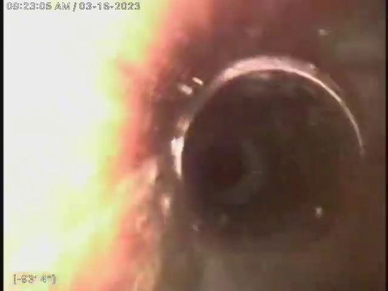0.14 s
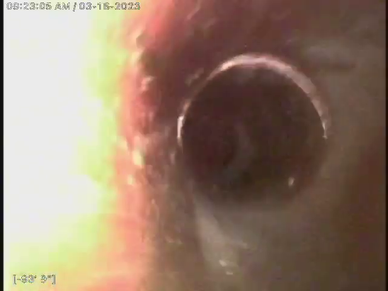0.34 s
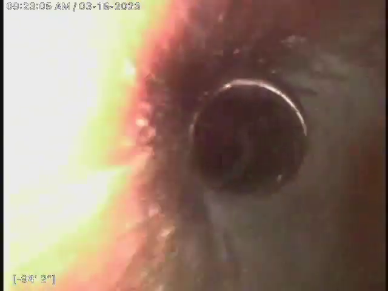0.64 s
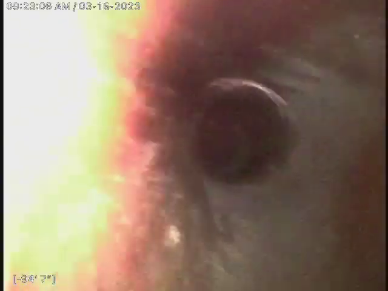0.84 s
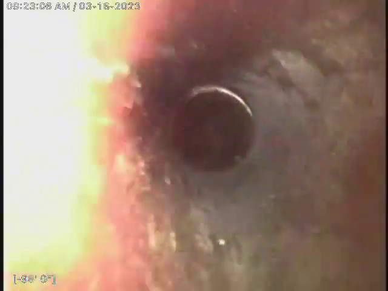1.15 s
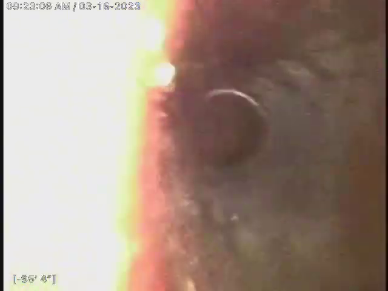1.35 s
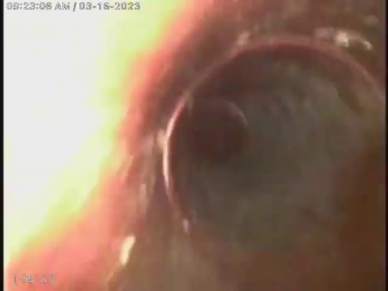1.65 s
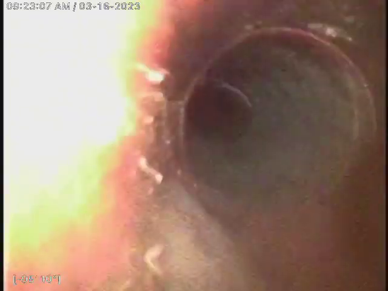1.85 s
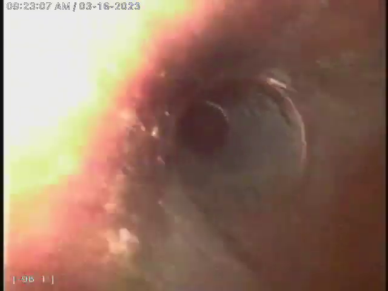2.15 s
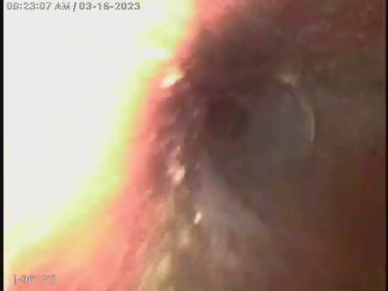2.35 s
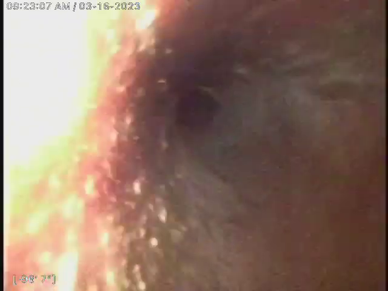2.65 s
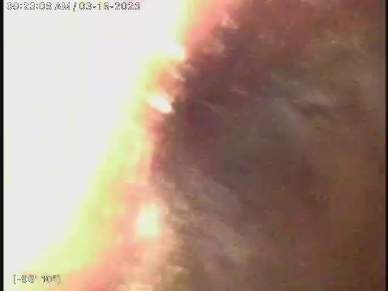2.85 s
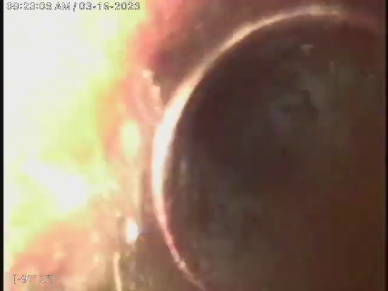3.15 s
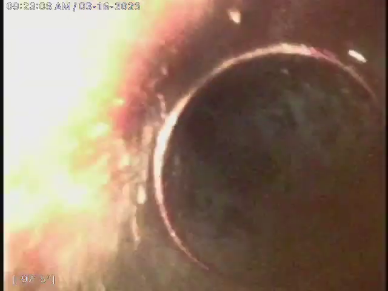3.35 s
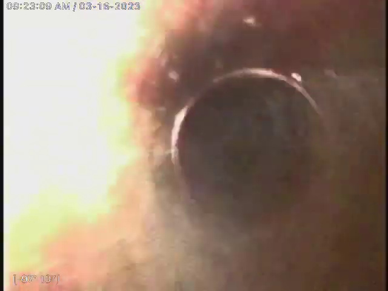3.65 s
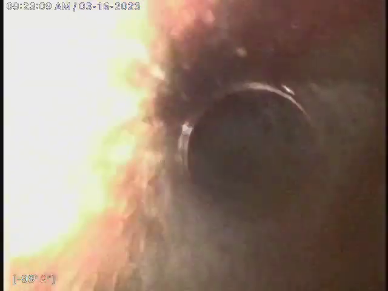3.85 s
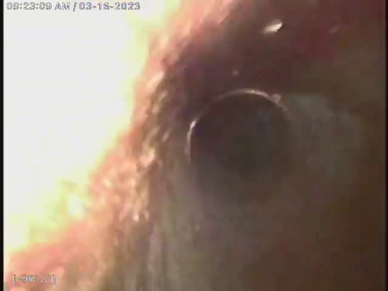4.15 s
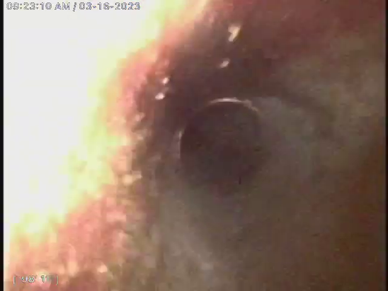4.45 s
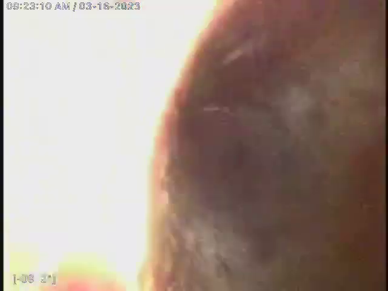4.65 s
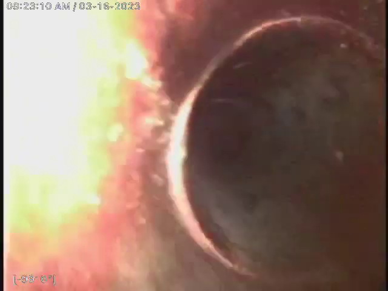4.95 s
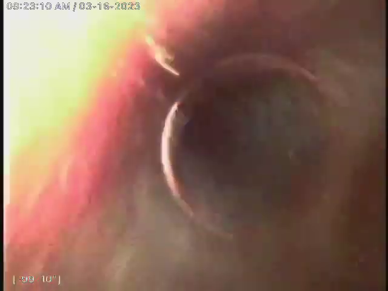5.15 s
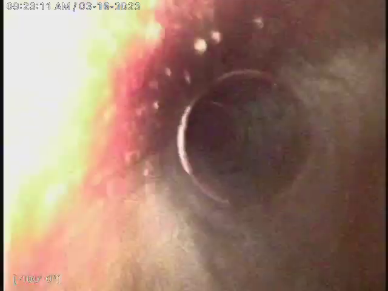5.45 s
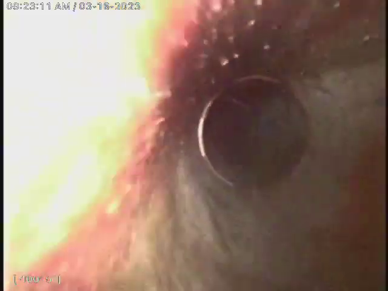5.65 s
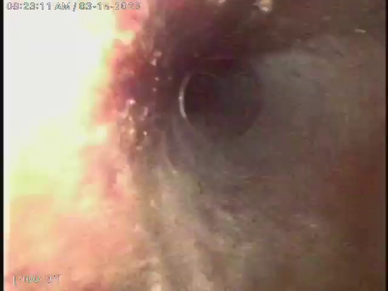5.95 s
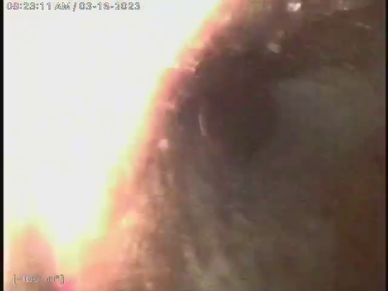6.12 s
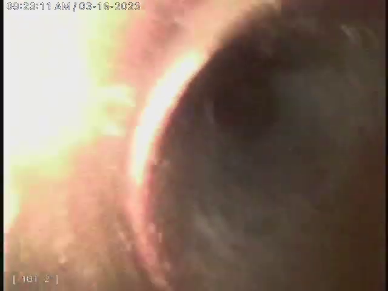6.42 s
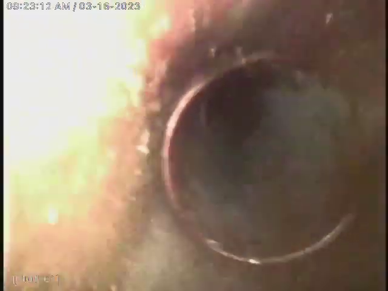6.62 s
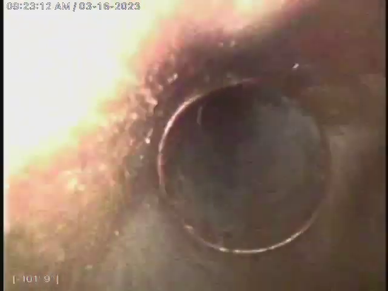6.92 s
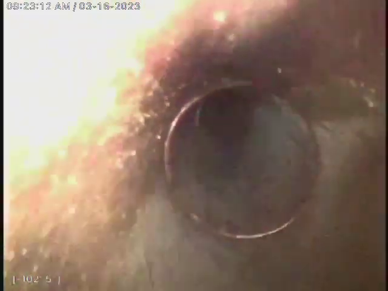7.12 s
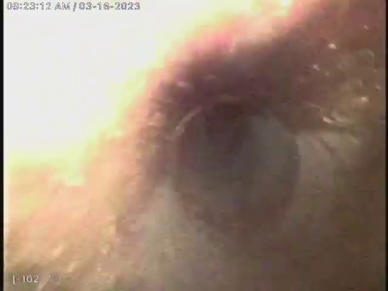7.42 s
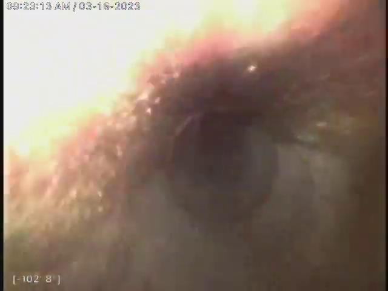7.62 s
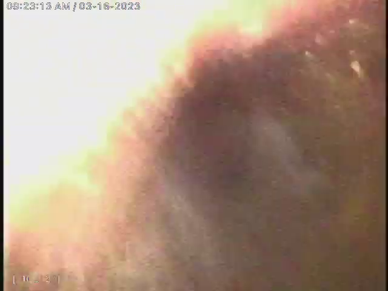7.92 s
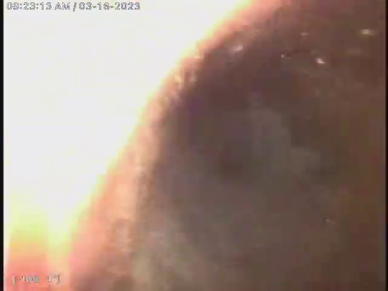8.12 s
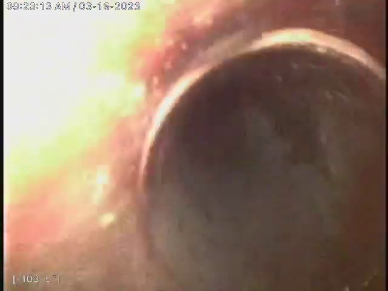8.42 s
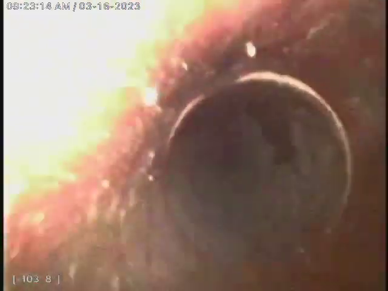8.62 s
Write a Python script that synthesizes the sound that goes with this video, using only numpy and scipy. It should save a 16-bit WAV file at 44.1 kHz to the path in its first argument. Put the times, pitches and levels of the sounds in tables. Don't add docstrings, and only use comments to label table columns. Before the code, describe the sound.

Outdoors, close to a small, slightly dull recorder, a stiff pipe-inspection cable is dragged over its metal reel frame. Tight clusters of hard slaps crack and rattle early, midway and late, with sharp ticks and soft bumps between. Gritty scraping and rustling swell with each tug, the reel rumbles, and small birds peep, trill and whistle over hiss and a deep distant traffic hum.

```python
import sys
import numpy as np
from scipy import signal
from scipy.fft import rfft, irfft, next_fast_len
from scipy.io import wavfile
from scipy.ndimage import uniform_filter1d, minimum_filter1d

SR = 44100
rng = np.random.default_rng(int(sys.argv[2]) if len(sys.argv) > 2 else 0)


def amplitude_ratio(level_db):
    exponent = np.asarray(level_db, float) / 20
    return 10 ** exponent


def to_wav(sig):
    pcm = np.clip(np.atleast_2d(sig), -1, 1) * 32767
    pcm = np.round(pcm).astype(np.int16)
    wavfile.write(sys.argv[1], SR, pcm.T)


N = 387198


def evened(x):
    return x / np.sqrt(np.mean(x ** 2) + 1e-20)


def add(mix, s, sound):
    part = mix[max(round(s * SR), 0):][:len(sound)]
    part += sound[:len(part)]


def coloured(x, points):
    f, db = np.transpose(points)
    size = next_fast_len(len(x))
    hz = np.fft.rfftfreq(size, 1 / SR)
    gain = amplitude_ratio(np.interp(np.log(hz + 1), np.log(f + 1), db))
    return irfft(rfft(x, size) * gain, size)[:len(x)]


def ring(modes, detune=1, rise_s=0.00079):
    t = np.arange(9000) / SR
    out = np.zeros(len(t))
    for (hz, db, t60), factor in zip(modes, detune * np.ones(len(modes))):
        out += amplitude_ratio(db - 60 * t / t60) * np.sin(2 * np.pi * hz * factor * t)
    return out * (1 - np.exp(-t / rise_s))


# pitch in Hz, level in dB, time to fall 60 dB in seconds.
DRUM_MODES = [(100.3, -9, 0.23), (178.8, -5.5, 0.081), (235.9, -7.5, 0.13), (392.6, -8.5, 0.085)]
# pitch in Hz, level in dB, time to fall 60 dB in seconds.
FRAME_MODES = [(558, -2.5, 0.011), (691, -1.5, 0.02), (821, 1.5, 0.018), (1101, -3.5, 0.017),
               (1450, -8, 0.01)]
# frequency in Hz, level in dB per Hz.
CRACK_COLOUR = [(760, -56), (1300, -32), (1460, 15.5), (1870, 12), (3180, 9), (5220, 1.5), (6280, 3.5),
                (6650, 1), (7200, -12.5), (9360, -40), (15800, -120)]


def blow(db, thud_db, crack_db, length_ms, thud_hz, rise_s, lag, tail_db):
    t = np.arange(12000) / SR
    white, sign = rng.standard_normal((2, len(t)))
    touch = rng.random(len(t)) < 1200 / SR
    detune = rng.uniform(0.896, 1.116, 9)
    end = max(length_ms, 1) / 1000
    burst = (1 - np.exp(-t / rise_s)) * np.exp(-t / (1.5 * end)) / (1 + (t / end) ** 6)
    hits = sign * touch * burst
    hits[round(rise_s * SR)] = 1.1

    crack_shape = burst * (1 + 0.65 * np.exp(-t / 0.001)) + amplitude_ratio(tail_db) * np.exp(-t / 0.031)
    crack = coloured(white + 5 * sign * touch, CRACK_COLOUR) * crack_shape
    frame = signal.fftconvolve(hits, ring(FRAME_MODES, detune[:5]))[:len(t)]

    bend = np.sin(2 * np.pi * thud_hz * (t - 0.0012 * np.exp(-t / 0.012)))
    bend *= amplitude_ratio(-60 * t / 0.068) * (1 - np.exp(-t / 0.0016))
    drum = np.pad(ring(DRUM_MODES, detune[5:], rise_s=0.0066), (0, len(t)))[:len(t)]
    thud = np.roll(bend + drum, round(lag * end * SR))

    out = np.zeros(len(t))
    for part, level in ((frame, db), (thud, db + thud_db), (crack, db + crack_db)):
        out += amplitude_ratio(level) * part / abs(part).max()
    return out * signal.windows.tukey(2 * len(t), .3)[len(t):]


# start in seconds, rattle peak in dB, crack in dB relative to it,
# rattle length in ms, thud pitch in Hz.
SLAPS = [(1.462, -6.5, -8, 14.8, 495), (1.47, -7, 2, 11, 370), (1.482, -5.5, -0.5, 14.4, 359),
         (1.494, -8, 0.5, 11.7, 252), (3.417, -17, -1, 14, 438), (3.7, -26.5, -7, 8.4, 510),
         (4.44, -8, -9, 13.5, 418), (4.444, -14.5, 4.5, 25, 249), (4.459, -10, -0.5, 21, 266),
         (6.315, -15.5, -1.5, 8.3, 313), (6.798, -18.5, -1, 11, 555), (7.617, -8, -3, 16.7, 410),
         (7.63, -8.5, 5, 18, 280), (7.65, -6, -2, 8.9, 383), (6.811, -26, -16, 16, 185),
         (3.705, -28, -25, 9.3, 248)]


def slaps():
    out = np.zeros(N)
    for s, db, crack_db, ms, hz in SLAPS:
        thud_db = -11 * np.log2(hz / 295)
        add(out, s, blow(db, thud_db, crack_db, ms, hz, rise_s=0.00063, lag=0.273, tail_db=-20.5))
    return out


# start in seconds, rattle peak in dB, thud and crack in dB relative to it,
# frequency in Hz above which the tick is dull.
TICKS = [
    (0.645, -33.5, -21, 1, 5000),
    (0.688, -50.5, -16, 15.5, 4000),
    (4.55, -25, -1, 13.5, 9000),
    (5.132, -31, -21, 11.5, 4400),
    (6.409, -39.5, 3, 12, 4000),
    (8.458, -32.5, -10, 10, 5500),
]


def ticks():
    out = np.zeros(N)
    for s, db, thud_db, crack_db, top_hz in TICKS:
        tick = blow(db, thud_db, crack_db, length_ms=11.3, thud_hz=318,
                    rise_s=0.000067, lag=0.24, tail_db=-14.5)
        add(out, s, signal.sosfilt(signal.butter(4, top_hz, fs=SR, output="sos"), tick))
    return out


# start in seconds, rattle peak in dB, thud and crack in dB relative to it,
# thud pitch in Hz.
BUMPS = [(0.663, -35, -5, -13, 224), (1.327, -33.5, 7, -8.5, 234), (1.648, -25.5, -11, -10, 417),
         (1.727, -31.5, -3, -20, 254), (2.075, -37, 5, -20, 186), (2.276, -31.5, 0.5, -15, 254),
         (3.429, -31, 18, -20, 214), (3.495, -38.5, -2, -21, 183), (4.999, -35, 7, -34, 270),
         (5.048, -31.5, 5.5, -19, 164), (5.517, -43.5, 9.5, -19, 132), (5.657, -32, -20, -17, 250),
         (5.775, -46.5, 21, -22, 99), (5.844, -32.5, -2, -20, 172), (7.167, -34.5, -9, -10, 180),
         (8.074, -36.5, -3, -20, 253), (8.127, -39, 11.5, -21, 267), (8.156, -31, 1, -10, 205),
         (8.204, -33.5, -5, -14, 180), (8.236, -31.5, 0, -18, 156), (8.683, -40, 12, -1, 199),
         (8.726, -41.5, 14, -15, 218), (8.756, -36, 11.5, 1, 181)]


def bumps():
    out = np.zeros(N)
    for s, db, thud_db, crack_db, hz in BUMPS:
        bump = blow(db, thud_db, crack_db, length_ms=8.6, thud_hz=hz,
                    rise_s=.0012, lag=0.33, tail_db=-14.5)
        add(out, s - .001, bump)
    return out


# start in seconds, pitch in Hz, level in dB.
PINGS = [
    (1.1, 2420, -41),
    (1.32, 2800, -44),
    (1.527, 2430, -34),
    (1.66, 2700, -42.5),
    (2.688, 2440, -39.5),
    (5.649, 2410, -36.5),
    (5.945, 2700, -45.5),
    (7.684, 2360, -39),
]


def pings():
    out = np.zeros(N)
    for s, hz, db in PINGS:
        add(out, s, amplitude_ratio(db) * ring([(hz, 3, .07)], rise_s=0.0013))
    return out


# start in seconds, length in seconds, pitch in Hz, level in dB, blur in Hz.
SQUEAKS = [
    (0.932, .089, 2500, -50.5, 500),
    (0.952, 0.066, 1155, -50, 200),
]


def squeaks():
    out = np.zeros(N)
    for s, length, hz, db, width in SQUEAKS:
        add(out, s, note(length, hz, hz, db, width))
    return out


def humps(rows):
    t = np.arange(0, N, 128)[:, None] / SR
    s, db, rise, fall = np.transpose(rows)
    away = np.maximum((t - s) / np.maximum(fall, .01), (s - t) / np.maximum(rise, .01))
    power = (amplitude_ratio(db - 15.5 * away) ** 2).sum(1)
    return np.interp(np.arange(N) / SR, t[:, 0], power)


def shudder(db, t60):
    return humps([(s + 0.024, level + db, .02, t60 * 15.5 / 60) for s, level, *_ in SLAPS])


def patchy(x, depth_db):
    hz, t, z = signal.stft(x, SR, nperseg=512)
    field = uniform_filter1d(rng.standard_normal(z.shape), size=6, axis=0)
    field = uniform_filter1d(field, size=7, axis=1)
    return evened(signal.istft(z * amplitude_ratio(depth_db * evened(field)), SR, nperseg=512)[1][:N])


def grit(per_s, spread_db):
    size = amplitude_ratio(spread_db * np.minimum(rng.exponential(1, N), 4)) * rng.choice([-1, 1], N)
    return size * (rng.random(N) < per_s / SR)


# time in seconds, level in dB.
TENSION = [(0, -46.5), (.26, -50.5), (.6, -54.5), (.86, -55), (1.35, -52), (1.9, -56), (2.1, -48.5),
           (2.47, -57), (3.0, -53.5), (3.85, -55), (4.3, -50), (4.8, -54.5), (5.36, -58.5), (5.95, -52.5),
           (6.82, -52.5), (6.98, -64.5), (7.3, -51.5), (8.78, -55)]


def tension():
    s, db = np.transpose(TENSION)
    return amplitude_ratio(np.interp(np.arange(N) / SR, s, db))


# peak in seconds, scrape in dB, rustle in dB relative to it,
# rise in seconds, fall in seconds.
TUGS = [(.17, -45.5, 1.5, 0.041, 0.033), (.47, -49.5, -4.5, 0.069, 0.28), (.664, -42, -7, 0.11, 0.044),
        (1.1, -53, 4.5, 0.16, .12), (1.33, -43.5, -9, 0.024, .2), (1.455, -35.5, -6.5, 0.081, 0.079),
        (1.665, -37.5, -14, .1, 0.16), (2.1, -47, -5.5, 0.13, 0.68), (4.585, -41, -6, .03, 0.13),
        (2.59, -46.5, -7, 0.057, 0.62), (2.72, -44.5, -0.5, 0.11, 0.14), (3.11, -53, 0.5, 0.023, 0.069),
        (3.65, -49, -3.5, 0.38, 0.16), (6.418, -53, 8.5, 0.079, 0.1), (4.17, -49.5, -15, 0.015, .07),
        (4.43, -42.5, -1.5, 0.12, 0.11), (5.06, -40.5, -4.5, 0.21, 0.26), (5.41, -55.5, -14, 0.023, 0.18),
        (5.67, -42, -4.5, 0.24, 0.19), (5.77, -42, -7, 0.052, 0.2), (6.305, -43, -2.5, 0.08, 0.19),
        (7.22, -45.5, -6, .2, 0.11), (8.255, -42.5, -8.5, 0.18, 0.22), (8.725, -44, -5.5, 0.062, 0.14)]


def drag_level():
    return np.sqrt((amplitude_ratio(-0.5) * tension()) ** 2 + humps(np.delete(TUGS, 2, axis=1)))


# frequency in Hz, level in dB per Hz.
SCRAPE_COLOUR = [(150, -68), (250, -19.5), (353, -9.5), (460, -0.5), (510, -1), (604, -6), (953, -4.5),
                 (1450, -12.5), (1880, -46), (3190, -120)]


def scrape():
    body = ring(FRAME_MODES[:4] + DRUM_MODES[2:])
    contacts = signal.oaconvolve(grit(per_s=330, spread_db=-2), body)[:N]
    smooth = coloured(rng.standard_normal(N), SCRAPE_COLOUR)
    sound = patchy(0.48 * evened(contacts) + 1.03 * evened(smooth), depth_db=3.0)
    return np.sqrt(drag_level() ** 2 + shudder(-33, t60=0.5)) * sound


# frequency in Hz, level in dB per Hz.
HISS_COLOUR = [(260, -33.5), (450, -32), (616, -15), (1100, -18), (1400, -16.5), (2420, -11), (3090, -15.5),
               (6260, -15), (6720, -16), (7200, -50), (9360, -85), (15800, -120)]


def rustle_and_hiss():
    grains = evened(grit(per_s=210, spread_db=8.5))
    sound = patchy(coloured(rng.standard_normal(N) + 0.25 * grains, HISS_COLOUR), depth_db=1.84)
    pull = tension()
    steady = amplitude_ratio(-54.5) * (pull / np.median(pull)) ** 0.64
    tugs = humps([(s, db + rustle_db, rise, fall) for s, db, rustle_db, rise, fall in TUGS])
    return np.sqrt(steady ** 2 + tugs + shudder(-37, t60=0.5)) * sound


# frequency in Hz, level in dB per Hz.
RUMBLE_COLOUR = [(15, -30.5), (25, -16), (38, -15.5), (59, -4), (102, -4), (135, -7.5), (171, -1),
                 (290, -9.5), (330, -9.5), (430, -16.5), (730, -120)]


def rumble():
    low = evened(coloured(rng.standard_normal(N), RUMBLE_COLOUR))
    hum = signal.sosfiltfilt(signal.butter(2, 80, fs=SR, output="sos"), low)
    return hum, low - hum


def turning_reel():
    drag = drag_level()
    level = amplitude_ratio(-44.5) * (drag / np.median(drag)) ** 0.64
    return np.sqrt(level ** 2 + shudder(-26, t60=0.76)) * rumble()[1]


def resonate(x, hz, width):
    turn = np.exp(2j * np.pi * np.cumsum(hz * np.ones(len(x))) / SR)
    r = np.exp(-np.pi * width / SR)
    smooth = signal.lfilter([1 - r], [1, -r], x / turn)
    smooth = signal.lfilter([1 - r], [1, -r], smooth)
    return (turn * smooth).real


def note(length, start_hz, end_hz, db, width):
    hz = np.linspace(start_hz, end_hz, round(length * SR))
    lead_in = np.pad(hz, (2000, 0), "edge")
    blur = evened(resonate(rng.standard_normal(len(lead_in)), lead_in, width)[2000:])
    pure = evened(np.sin(2 * np.pi * np.cumsum(hz) / SR))
    tone = 0.31 * blur + pure * np.clip(40 / width, 0, 1)
    return amplitude_ratio(db) * evened(tone) * signal.windows.tukey(len(hz), .7)


# start in seconds, level in dB.
PEEPS = [
    (.074, -50),
    (0.451, -46.5),
    (0.787, -47),
]
CHIP_LAGS = (.054, .069)


def peeps():
    out = np.zeros(N)
    for s, db in PEEPS:
        add(out, s, note(0.06, 5330, 5310, db, 50))
        add(out, s + CHIP_LAGS[0], note(.02, 3800, 3150, db - 3, 45))
        add(out, s + CHIP_LAGS[1], note(.022, 3760, 2910, db - .6, 45))
    return out


# start in seconds, length in seconds, pitch in Hz, level in dB.
LOW_VOICE = [
    (1.026, 0.1, 3744, -43),
    (1.127, 0.04, 3700, -52),
    (1.222, 0.042, 3740, -55),
    (1.369, 0.064, 3750, -43.5),
    (1.719, .14, 3710, -49.5),
]
# start in seconds, length in seconds, pitch in Hz, level in dB.
HIGH_VOICE = [
    (1.02, 0.15, 3967, -46),
    (1.377, 0.13, 3925, -44),
    (1.723, 0.079, 3890, -44.5),
]


def duets():
    out = np.zeros(N)
    for s, length, hz, db in LOW_VOICE:
        add(out, s, note(length, hz + 20, hz - 30, db, 48))
    for s, length, hz, db in HIGH_VOICE:
        add(out, s, note(length, hz - 15, hz + 35, db, 48))
    return out


# start in seconds, length in seconds, pitch in Hz, level in dB.
THIN = [
    (4.15, 0.17, 6320, -55),
    (4.6, 0.14, 6300, -50.5),
    (5.05, 0.2, 6220, -56.5),
    (5.17, 0.14, 4970, -54.5),
    (5.241, 0.16, 4880, -47.5),
    (5.39, 0.2, 4890, -58),
    (6.46, .1, 4040, -58),
    (5.628, 0.11, 3530, -49),
]


def thin_whistles():
    out = np.zeros(N)
    for s, length, hz, db in THIN:
        add(out, s, note(length, hz, hz - 332 * length, db, 110))
    add(out, THIN[-1][0] - .008, note(0.039, 3150, 3500, -48, 60))
    return out


# start in seconds, length in seconds, level in dB, chip level in dB.
SONG = [
    (4.709, 0.13, -56, -49),
    (5.835, .1, -48, -54),
    (5.993, .16, -53, -49.5),
    (6.18, 0.13, -51, -52),
    (6.36, .12, -51.5, -51),
    (6.545, 0.12, -51.5, -53),
    (6.728, 0.15, -54, -52),
]


def song():
    out = np.zeros(N)
    for s, length, db, chip_db in SONG:
        add(out, s, note(length, 4040, 3995, db, 80))
        add(out, s + .015, note(0.96 * length, 3810, 3820, db - 7, 250))
        add(out, s + .042, note(.024, 4000, 3050, chip_db, 50))
        add(out, s + .042 + .047, note(0.019, 3980, 3800, chip_db - 4, 50))
    return out


def trill():
    out = np.zeros(N)
    count = 8
    for k in range(count):
        s = 1.862 + .089 * k
        db = -51 + 3 * np.sin(np.pi * k / (count - 1))
        add(out, s, note(0.0117, 5710, 4320, db, 300))
        add(out, s + 0.013, note(0.017, 4740, 4700, db - 4.0, 270))
    return out


# sideband number, length in seconds, level in dB.
BUZZ = [
    (-1, 0.18, -55),
    (0, 0.24, -50),
    (1, 0.098, -49.5),
    (2, 0.15, -55),
]


def buzz():
    out = np.zeros(N)
    start_s = 2.575
    for side, length, db in BUZZ:
        hz = 4290 + side * 308
        add(out, start_s, note(length, hz, hz - 300 * length, db, 63))
    add(out, start_s, note(.22, 4570, 4460, -49.5, 700))
    return out


def birds():
    calls = peeps() + duets() + thin_whistles() + song() + trill() + buzz()
    t = np.arange(9000) / SR
    echo = rng.standard_normal(len(t)) * amplitude_ratio(-60 * t / .35) * (t > .01)
    return calls + amplitude_ratio(-7) * signal.fftconvolve(calls, echo / np.linalg.norm(echo))[:N]


def traffic():
    return amplitude_ratio(-34.5) * rumble()[0]


def scene():
    cable = slaps() + ticks() + bumps() + pings() + squeaks()
    drag = scrape() + rustle_and_hiss() + turning_reel()
    return (cable + drag + birds() + traffic())[None]


def top_cut(x):
    return signal.sosfilt(signal.butter(12, 8020, fs=SR, output="sos"), x)


def record(dry):
    dry = signal.sosfilt(signal.butter(3, 36, "high", fs=SR, output="sos"), dry)
    dry = .9 * np.tanh(dry / .9)
    hz, t, z = signal.stft(dry, SR, nperseg=1024, noverlap=768)

    steps = 120 * np.repeat(rng.standard_normal(len(t) // 12 + 1), 12)[:len(t)]
    level_db = 10 * np.log10((abs(z[0, 50:150]) ** 2).sum(0) + 1e-12)
    edge_hz = 6770 + steps + 14 * np.maximum(level_db + 53.5, 0)
    edge_db = np.clip(-.3 * (hz[:, None] - edge_hz), -62, 0)

    power = uniform_filter1d(abs(z[0]) ** 2, size=10, axis=1)
    power = uniform_filter1d(power, size=3, axis=0)
    power_db = 10 * np.log10(abs(power) + 1e-14)
    masker_db = -minimum_filter1d(-power_db, size=13, axis=0, origin=6)
    masked = (power_db < masker_db - 16) & (hz[:, None] > 3900)

    z = z * amplitude_ratio(edge_db - 30 * masked)
    x = signal.istft(z, SR, nperseg=1024, noverlap=768)[1][:, :N]
    mix = x + amplitude_ratio(-100) * rng.standard_normal(x.shape)
    return top_cut(mix)


dry = scene()
out = record(dry)
to_wav(out)
```